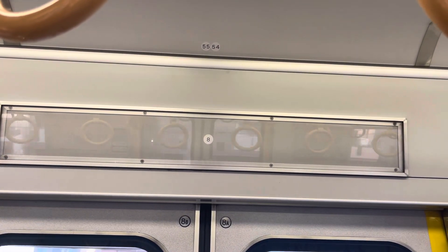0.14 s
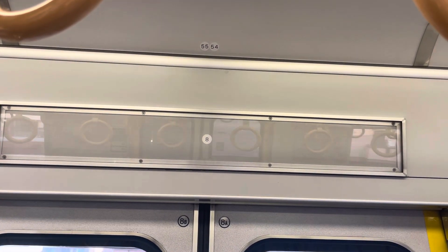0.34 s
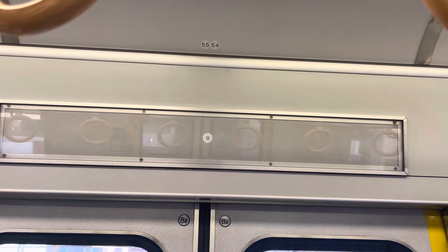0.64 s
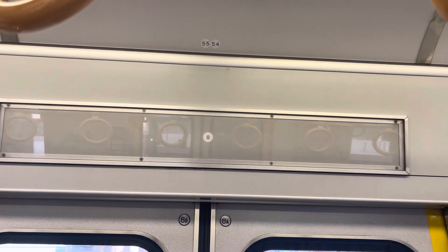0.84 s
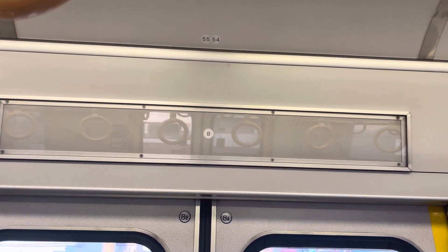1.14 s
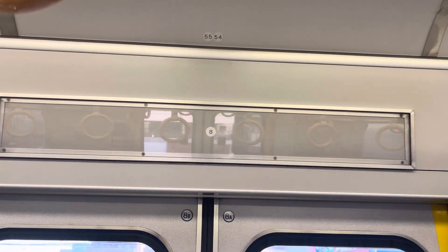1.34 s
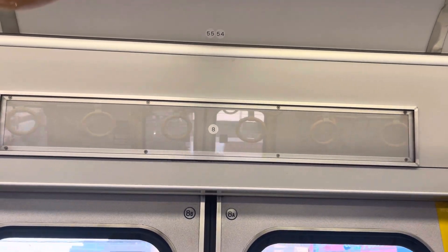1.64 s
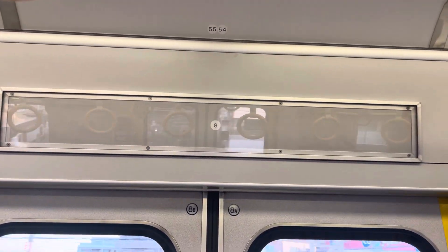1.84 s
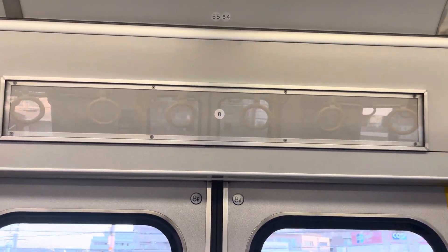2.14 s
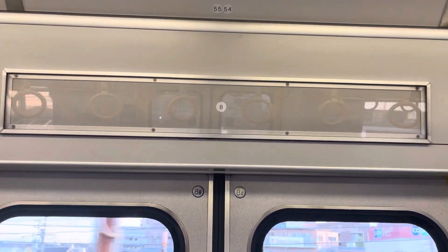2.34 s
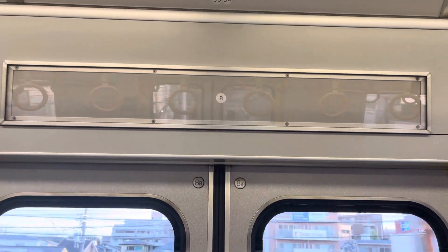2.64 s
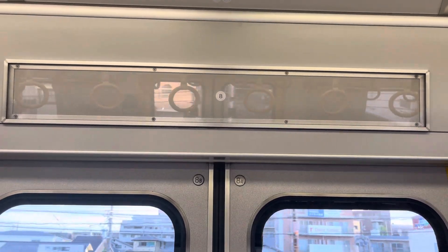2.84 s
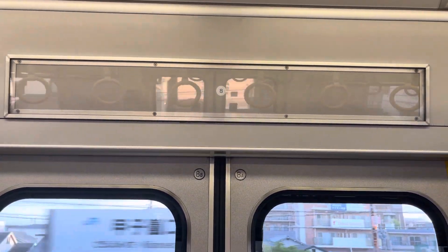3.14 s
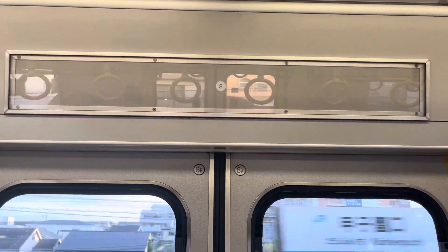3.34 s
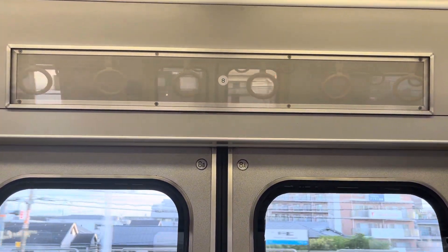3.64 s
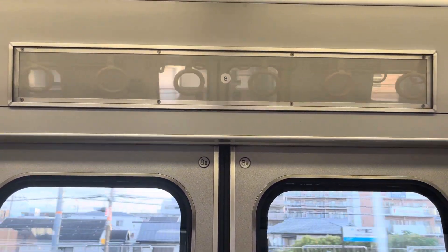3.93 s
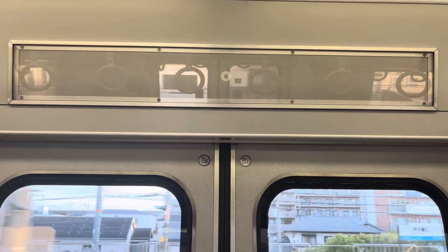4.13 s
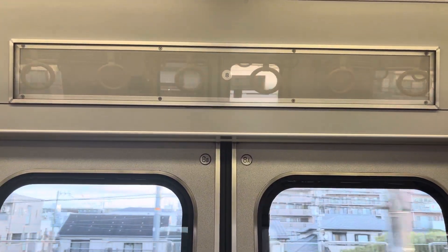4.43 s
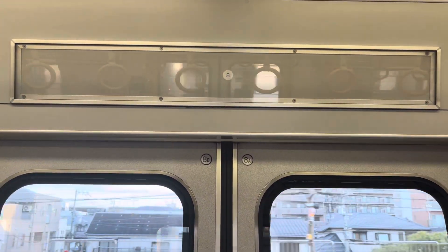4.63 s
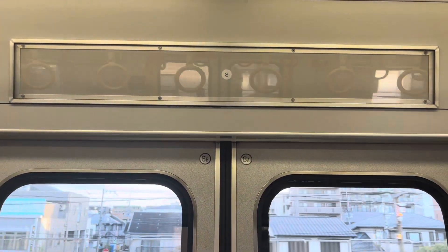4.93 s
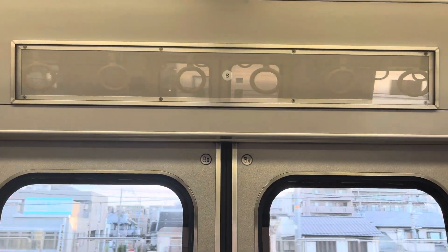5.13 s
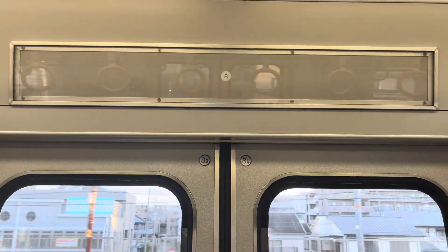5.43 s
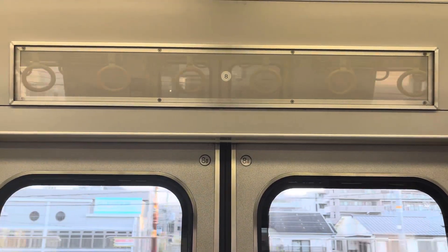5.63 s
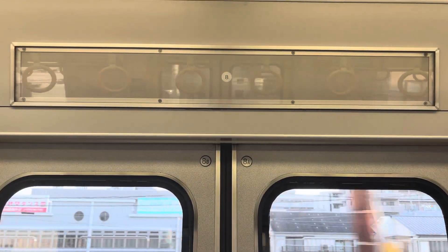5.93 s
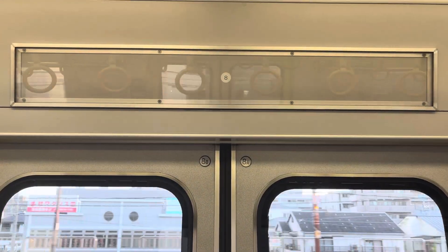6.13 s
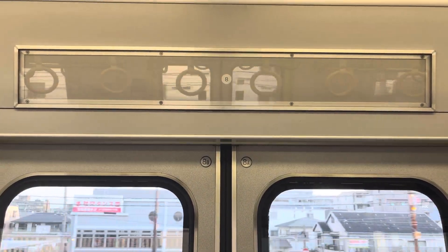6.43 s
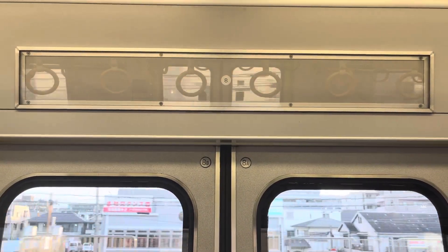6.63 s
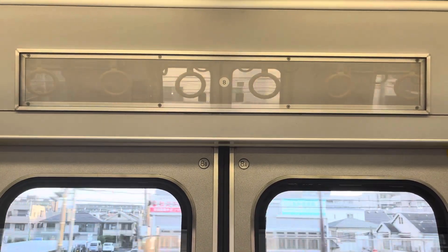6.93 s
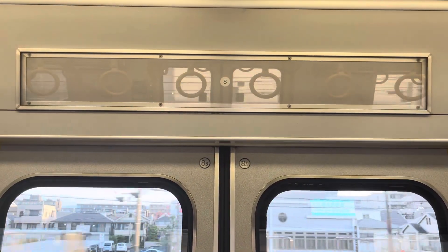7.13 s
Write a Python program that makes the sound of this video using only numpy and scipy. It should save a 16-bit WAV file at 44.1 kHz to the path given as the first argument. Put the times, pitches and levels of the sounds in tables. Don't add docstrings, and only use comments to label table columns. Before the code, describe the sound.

Throughout about 7.3 seconds, the inside of a running electric train gives a deep, boxy rumble with a low hum near 59 Hz, strong at first, almost vanishing around 4.5 s, then returning. The floor booms near 100 Hz in uneven pulses, notably at 0.7, 1.2 and 5.4 s. Soft vent hiss and muffled wheel rush stay steady. Dull rail thumps land at 1.0 and 1.16 s, another near 4.8. Door rubber makes breathy, fizzy rubs at 0.8, 1.4, 2.05, 2.8, 3.6 and 4.2 s, calming after 5.6. Tiny sharp metallic ticks occur at 1.4 and 1.9, cluster around 2.05, then 2.35, 3.9, 5.7, with the crispest at 6.8. A faint gear whine rises from about 300 to 440 Hz, clearer near 6 and 7 s, when rolling roughens, joints ring and rims sing. Close stereo phone perspective.

```python
import sys
import numpy as np
from scipy import signal
from scipy.fft import rfft, irfft, next_fast_len
from scipy.io import wavfile
from scipy.ndimage import uniform_filter1d, map_coordinates

SR = 44100
rng = np.random.default_rng(int(sys.argv[2]) if len(sys.argv) > 2 else 0)


def gain_from_decibels(decibels):
    exponent = np.asarray(decibels, float) / 20
    return 10 ** exponent


def persist_wave(psi):
    counts = np.round(np.clip(psi, -1, 1) * 32767).astype(np.int16)
    wavfile.write(sys.argv[1], SR, np.atleast_2d(counts).T)


N = 320607

# time_s, tooth_hz, level_db
GEAR_WHINE = [(0, 301, -61), (.7, 312, -59), (1.3, 321, -44), (2.3, 348, -52), (3, 363, -51.5),
              (3.7, 375, -43.5), (4.5, 390.4, -48.5), (5.2, 418, -48), (5.7, 425.4, -53),
              (5.95, 430, -34.5), (6.3, 437.2, -41.5), (6.6, 432.4, -46.5), (7, 436.3, -35.5),
              (7.27, 442, -53)]
# pitch_hz, level_db (per Hz)
FINE_FIZZ = [(6000, -39), (7200, -0.5), (8400, -9.5), (9450, 4.5), (10200, -2.5), (11000, -1), (11200, -3),
             (11500, -1.5), (14000, -7.5), (15900, -6.5)]


def unit(x):
    return x / np.sqrt(np.mean(x ** 2) + 1e-20)


def along(points, hz):
    f, v = np.transpose(points)
    return np.interp(np.log(hz + 1), np.log(f + 1), v)


def curves(rows):
    s, *columns = np.transpose(rows)
    return [np.interp(np.arange(N) / SR, s, column) for column in columns]


def wobble(rate):
    knots = rng.standard_normal(int(N * rate / SR) + 4)
    return map_coordinates(knots, [np.arange(N) * rate / SR])


def filtered(x, response):
    m = next_fast_len(x.shape[-1] + SR // 2)
    spectrum = rfft(x, m) * response(np.fft.rfftfreq(m, 1 / SR))
    return irfft(spectrum, m)[..., :x.shape[-1]]


def modes(table):
    def response(f):
        total = 0
        for k, (center, width, db) in enumerate(table):
            damping = 1j * f * width
            total = total + (-1) ** k * gain_from_decibels(db) * damping / (center * center - f * f + damping)
        return total
    return response


def shape(table):
    return lambda f: gain_from_decibels(along(table, f))


def noise(response, patchy_db):
    hz, _, z = signal.stft(rng.standard_normal((2, N), np.float32), SR, nperseg=2048)
    patches = uniform_filter1d(rng.standard_normal(z.shape[1:]), size=18, axis=0)
    patches = uniform_filter1d(patches, size=3, axis=1)
    z = z * gain_from_decibels(patchy_db * unit(patches)) * np.abs(response(hz))[:, None]
    return unit(signal.istft(z, nperseg=2048)[1][:, :N])


def tone(hz, db):
    return np.sqrt(2) * gain_from_decibels(db) * np.sin(2 * np.pi * np.cumsum(hz) / SR) * [[1], [0]]


def burst(rows, rise):
    out, t = np.zeros(N + SR), np.arange(SR // 2) / SR
    for s, db, t60 in rows:
        out[round(s * SR):][:len(t)] += gain_from_decibels(db - 60 * t / t60) * (1 - np.exp(-t / rise))
    return out[:N]


def speed():
    tooth_hz = curves(GEAR_WHINE)[0]
    return tooth_hz / tooth_hz.mean()


def vents():
    # pitch_hz, level_db (per Hz)
    vent_air = [(1500, -26), (2500, 0.5), (3300, -4.5), (4200, -5.5), (4650, -3.5), (5100, -6), (5800, -10),
                (6600, -15), (9000, -18.5), (10500, -19), (12500, -24.5), (14000, -23.5), (16000, -35.5)]
    draught = speed() ** 0.4
    return gain_from_decibels(-60.5 + 0.73 * wobble(2.3)) * draught * noise(shape(vent_air), patchy_db=0.7)


def clicks():
    # start_s, peak_db, dull_part_db (over the peak)
    fitting_ticks = [(1.3886, -62.5, -8), (1.8895, -60, -6), (2.041, -57, -8), (2.0685, -51, -1),
                     (2.0808, -59, -1.5), (2.354, -54.5, -7), (3.9041, -60.5, -5.5), (5.672, -60.5, -4.5),
                     (6.3088, -65, -5.5), (6.6079, -63.5, -5.5), (6.6952, -63.5, -7.5), (6.718, -61, -6),
                     (6.795, -47.5, -10), (6.8124, -57.5, -11.5)]
    # pitch_hz, level_db, fade_s (to fall 60 dB)
    metal_notes = [(7200, -5, .06), (9960, -3, .08), (11170, 3, .08), (12080, -9.5, .06),
                   (12730, -17.5, .06)]
    click_t60 = 0.085
    bright = burst([(s, db, click_t60) for s, db, _ in fitting_ticks], rise=0.0012)
    snap = burst([(s, db - 4.5, 0.008) for s, db, _ in fitting_ticks], rise=0.0001)
    dull = burst([(s, db + dull_db, 2.7 * click_t60) for s, db, dull_db in fitting_ticks], rise=0.002)
    metal = modes([(hz, 2.2 / t60, db) for hz, db, t60 in metal_notes])
    ring = filtered(bright * rng.standard_normal((2, N)), metal)
    snap_color = shape([(2500, -28), (7500, -2.5), (12000, -1.5), (16000, 5)])
    crack = gain_from_decibels(-5.0) * bright * noise(shape(FINE_FIZZ), 0)
    crack = crack + gain_from_decibels(11.5) * snap * noise(snap_color, 0)
    return crack + dull * noise(modes([(3800, 2400, 0)]), 0) + gain_from_decibels(13.5) * ring


def seal():
    # start_s, length_s, hiss_db, fizz_db (over hiss), fizz_peak (share of the stroke)
    sway_strokes = [
        (-.2, 0.15, -54, -8.5, .9),
        (0.828, .23, -59.5, -16.5, .6),
        (1.135, .06, -67.5, -12, .6),
        (1.271, 0.05, -62.5, -16, .4),
        (1.369, .41, -60.5, -10.5, 0.65),
        (2.046, 0.51, -60, -6.5, .6),
        (2.672, .1, -73, -7, .3),
        (2.833, .28, -59, -11, 0.65),
        (3.612, .31, -59.5, -12.5, .85),
        (4.239, 0.35, -59.5, -10.5, .75),
    ]
    # pitch_hz, level_db (per Hz)
    rubber_hiss = [(3800, -14), (4400, -8.5), (4620, -0.5), (4900, -2.5), (5280, -4.5), (5600, -1.5),
                   (5950, 1), (6200, -9), (7000, -11), (8000, -22), (10000, -52.5)]
    # pitch_hz, width_hz, level_db
    leaf_notes = [(4750, 90, -2), (5340, 82, 2), (5900, 110, -1), (6114, 60, -3.5), (9400, 90, -5),
                  (11175, 70, -5.5)]
    grip_s, slip_t60 = 0.053, 0.54
    sag_db, fizz_swell_db = 1.1, 8
    t = np.arange(N) / SR
    creep = (t < 5.6) * gain_from_decibels(2.5 * wobble(9))
    rub, fine = gain_from_decibels(-92.5) * creep, gain_from_decibels(-81.5) * creep
    for s, length, db, fizz_db, peak in sway_strokes:
        fade_db = 60 * np.clip(t - s - length, 0, 2) / slip_t60
        stroke = gain_from_decibels(db - fade_db) * np.clip((t - s) / grip_s, 0, 1)
        progress = (t - s) / length
        rub = rub + stroke * gain_from_decibels(-sag_db * np.clip(2 * progress - 1, -1, 1) ** 2)
        swell = 0.5 - 2 * np.clip(np.abs(progress - peak), 0, 1)
        fine = fine + stroke * gain_from_decibels(fizz_db + fizz_swell_db * swell)
    grit = gain_from_decibels(0.88 * wobble(60) + 1.0 * wobble(12))
    leaf = noise(lambda f: modes(leaf_notes)(f) ** 2, patchy_db=-1)
    hiss = noise(shape(rubber_hiss), patchy_db=1.5) + gain_from_decibels(-7.5) * leaf
    fizz = noise(shape(FINE_FIZZ), patchy_db=2.5)
    return grit * (gain_from_decibels(0.8) * rub * hiss + gain_from_decibels(1.0) * fine * fizz)


def joints():
    # start_s, frame_db, axle_db (over frame)
    rail_gaps = [(.97, -31.5, -14.5), (1.16, -25, -24.5), (4.521, -50, 6), (4.799, -31.5, -3.5),
                 (5.099, -41, -8), (5.23, -42, 8.5), (5.96, -40, 10), (6.12, -40, 6.5), (6.85, -37.5, 6),
                 (6.932, -40.5, 8.5), (7.0, -35, 4.5), (7.099, -37.5, 7.5)]
    # pitch_hz, width_hz, level_db
    bogie_notes = [(215, 65, 0.5), (264, 17, -1), (323, 24, -8.5)]
    # pitch_hz, width_hz, level_db
    axle_notes = [(395, 15, 6), (431.7, 16, 0), (602, 26, -9), (780, 39, -13.5), (1020, 160, -23.5),
                  (1490, 44, -15)]
    thump_t60 = 0.19
    frame_blows = burst([(s, db, thump_t60) for s, db, _ in rail_gaps], rise=0.012)
    axle_blows = burst([(s, db + axle_db, thump_t60) for s, db, axle_db in rail_gaps], rise=0.007)
    frame = filtered(frame_blows * rng.standard_normal((2, N)),
                     lambda f: modes(bogie_notes)(f) / (1 + 1j * f / 600) ** 2)
    axle = filtered(axle_blows * rng.standard_normal((2, N)),
                    lambda f: modes(axle_notes)(f) / (1 + 1j * f / 3000) ** 3)
    return gain_from_decibels(27.5) * (frame + axle)


def wheels():
    # time_s, level_db
    rail_roughness = [(0, 2), (.1, 0), (.9, 2), (1.15, 2.5), (1.4, 1), (2.6, 0), (4.4, 0), (4.9, 1.5),
                      (5.3, 6), (5.8, 0), (5.97, 4.5), (6.3, 3), (6.5, 2), (6.8, 2.5), (7.01, 10.5),
                      (7.27, 5)]
    # pitch_hz, level_db (per Hz)
    rumble_color = [(20, -37), (30, -29.5), (42, -11), (52, -5), (75, -10), (125, -7.5), (165, -20),
                    (185, -18.5), (215, -19), (300, -22.5), (420, -24), (480, -28.5), (700, -48),
                    (1400, -93)]
    # pitch_hz, width_hz, level_db
    frame_notes = [(212.8, 24.3, -0.5), (339.7, 13, 0), (394, 49, -3), (430, 42, -9), (593.5, 28, -6),
                   (690, 24, -12.5), (1020, 110, -11.5)]
    # pitch_hz, level_db (per Hz)
    rush_color = [(350, -20), (520, -2.5), (610, -2.5), (800, -6), (1250, -9.5), (1550, -12.5), (1750, -16),
                  (2300, -22), (3000, -24), (4500, -32), (8000, -71.5)]
    # pitch_hz, width_hz, level_db
    rim_notes = [(1481, 110, -0.5), (1975, 90, 0), (2097, 120, -6.5), (2720, 120, -5.5), (2937, 130, -5.5)]
    # start_s, level_db
    rim_sings = [(1.08, -62.5), (1.27, -60), (3.02, -55), (4.58, -64), (5.251, -69.5), (6.05, -61),
                 (6.18, -59), (6.31, -56), (6.87, -62.5), (7.0, -57.5), (7.15, -54)]
    rough_db, = curves(rail_roughness)
    rolling_db = rough_db + 1.5 * wobble(9)
    rumble = unit(filtered(rng.standard_normal((2, N)), shape(rumble_color)))
    rumble = gain_from_decibels(rolling_db - 32) * rumble
    frame = unit(filtered(rng.standard_normal((2, N)), lambda f: modes(frame_notes)(f) ** 2))
    frame = gain_from_decibels(rolling_db - 47.5) * frame
    rush_db = -45.5 + 0.4 * rough_db + 0.53 * wobble(7)
    rush = gain_from_decibels(rush_db) * noise(shape(rush_color), patchy_db=1.39)
    sing = burst([(s, db + 7.5, 0.25) for s, db in rim_sings], rise=0.03)
    steady = gain_from_decibels(-59.5 + 0.45 * rough_db + 1.2 * wobble(8))
    rims = noise(lambda f: modes(rim_notes)(f) ** 2, patchy_db=2.4)
    rims = speed() ** 1.5 * np.hypot(steady, sing) * rims
    return rumble + frame + rush + rims


def body():
    # pitch_hz, width_hz, level_db
    panel_notes = [(101.3, 13.2, -3.5), (119.5, 8, -6), (148.4, 20, -9)]
    # center_s, level_db, panel_hz, half_length_s
    rail_dips = [(0.01, -24, 101.5, 0.051), (.19, -24.5, 105.1, 0.026), (0.343, -22.5, 112, 0.029),
                 (0.484, -22.5, 97, .06), (0.697, -17, 100, 0.027), (1.063, -20, 104.1, .11),
                 (1.215, -16.5, 103.8, 0.031), (1.397, -27.5, 102.1, 0.046), (1.598, -24.5, 112, .05),
                 (1.898, -22, 102, 0.12), (2.141, -23.5, 104, 0.064), (2.387, -21.5, 100.9, .04),
                 (2.562, -24.5, 103.3, .04), (2.679, -22, 103.6, .04), (2.903, -27.5, 105, 0.076),
                 (3.274, -22.5, 100.1, .05), (3.858, -25.5, 112, .04), (4.182, -23, 99.2, 0.045),
                 (4.363, -25, 100, 0.078), (4.924, -22, 106.4, .13), (5.2, -25.5, 102.2, .08),
                 (5.423, -18, 104, 0.043), (5.599, -23.5, 105.5, .07), (5.816, -26.5, 108, 0.03),
                 (6.118, -24.5, 98, .1), (6.429, -24.5, 100.9, 0.1), (6.804, -23, 99, .1),
                 (7.029, -21, 102.1, .04), (7.211, -20, 101.5, 0.037)]
    ring = unit(filtered(rng.standard_normal((2, N)), lambda f: modes(panel_notes)(f) ** 2))
    ring = ring / (0.96 + np.sqrt(np.abs(uniform_filter1d(ring[0] ** 2, size=5000))))
    notes = np.zeros((2, N + 2 * SR))
    t = np.arange(-SR // 2, SR // 2) / SR
    phases = rng.random((len(rail_dips), 2, 1))
    for (s, db, hz, half), phase in zip(rail_dips, phases):
        swell = gain_from_decibels(db + 2) * np.exp(-(t / half) ** 2)
        swell = swell * np.sin(2 * np.pi * (hz * t + phase))
        notes[:, round(s * SR):][:, :len(t)] += swell * [[1], [0.5]]
    return gain_from_decibels(-30.5) * unit(ring) + notes[:, SR // 2:][:, :N]


def machines():
    # time_s, level_db
    hum_swells = [(0, 5.5), (.3, 4), (.8, 0), (1.08, -4), (1.27, 2.5), (1.5, -1), (2.55, -1), (3.4, -1),
                  (3.93, -4), (4.33, 8), (4.6, 9.5), (4.93, 2.5), (5.5, 3.5), (6.5, -1), (6.99, 0),
                  (7.06, -7), (7.13, 1), (7.27, -5.5)]
    cancel_s, beat_s = 4.486, 4.46
    weaker_db = -0.2
    turn = np.pi * (np.arange(N) / SR - cancel_s) / beat_s
    beat = np.abs(np.exp(1j * turn) - gain_from_decibels(weaker_db) * np.exp(-1j * turn)) / 2
    hum_hz = 59.12 + 0.22 * wobble(6)
    hum_db = -18.5 + curves(hum_swells)[0] + 0.5 * wobble(8.3)
    tooth_hz, tooth_db = curves(GEAR_WHINE)
    whine = tone(tooth_hz + 3.5 * wobble(20), tooth_db - 4 + 2.2 * wobble(11))
    return beat * tone(hum_hz, hum_db) + whine


def scene():
    return vents() + clicks() + seal() + joints() + wheels() + body() + machines()


def top_cut(x):
    return signal.sosfilt(signal.butter(12, 15770, fs=SR, output="sos"), x)


def record(dry):
    # pitch_hz, likeness (0 to 1)
    stereo_likeness = [(60, 0.71), (110, 0.91), (270, 0.62), (450, 0.27), (700, 0.031), (1600, 0.052),
                       (1800, 0.47), (2050, 1), (2250, 0.17), (2700, .37), (5000, 0.44), (6000, .55),
                       (7200, 0.36),
                       (7200, .5), (7800, .92), (8800, .92), (9600, .55), (10300, .6), (11200, .92),
                         (12900, .92), (13700, .4), (14600, .92)]
    # pitch_hz, lead_radians
    port_lead = [(60, 0), (120, .08), (300, .25), (1700, -.4), (3000, -.9), (4850, -.5), (5500, 1.3),
                 (6400, 1.3),
                 (7650, np.pi), (8900, np.pi), (10000, 4.7), (11200, 2 * np.pi), (13000, 2 * np.pi),
                   (13600, 7), (14400, 3 * np.pi)]
    # pitch_hz, level_db
    port_tilt = [(60, -1), (350, -1.8), (900, -.2), (1550, -2.3), (1750, 2.5), (2800, 2.5), (4500, 5.3),
                 (5800, 3.3), (7600, 0)]
    edge = SR // 10
    dry = np.pad(dry, ((0, 0), (edge, edge)), "reflect", reflect_type="odd")

    def shares(f):
        likeness = np.clip(along(stereo_likeness, f), 0, 1)
        angle = np.arccos(likeness) / 2
        return np.array([np.cos(angle), np.sin(angle)])

    def port_gains(f):
        lead = along(port_lead, f)
        left = gain_from_decibels(along(port_tilt, f) / 2) * np.exp(-0.5j * lead)
        return np.array([left, 1 / left])

    direct, diffuse = filtered(dry, shares)
    ports = filtered(np.array([direct + diffuse, direct - diffuse]), port_gains)
    return top_cut(ports[:, edge:-edge])


dry = scene()
out = record(dry)
persist_wave(out)
```